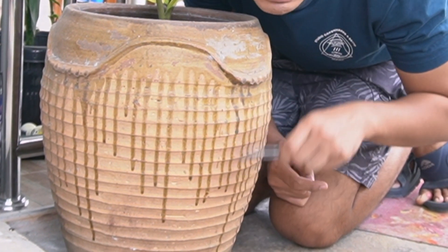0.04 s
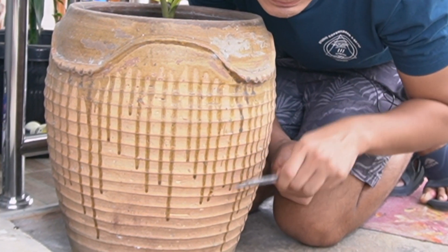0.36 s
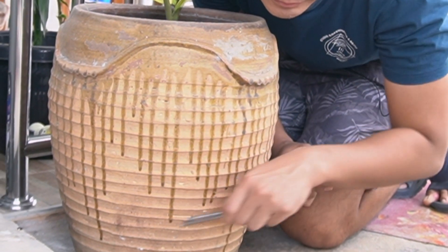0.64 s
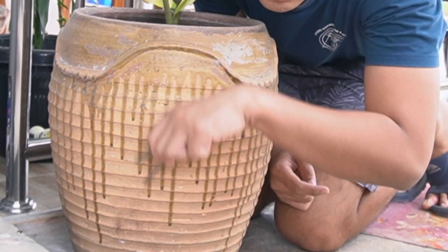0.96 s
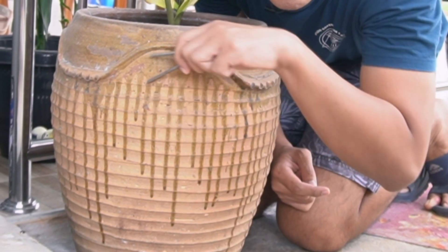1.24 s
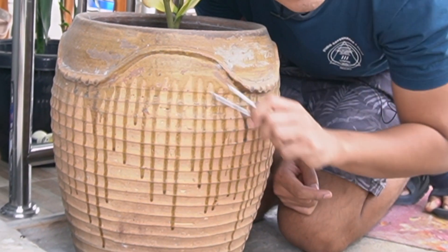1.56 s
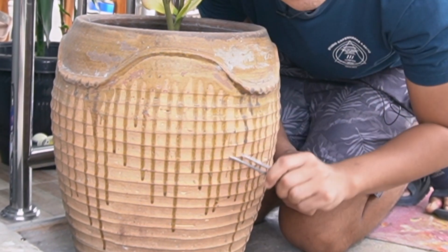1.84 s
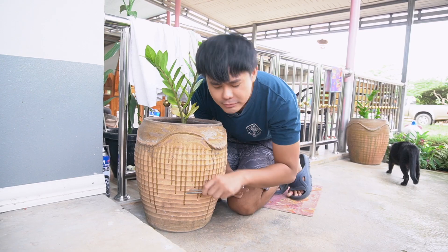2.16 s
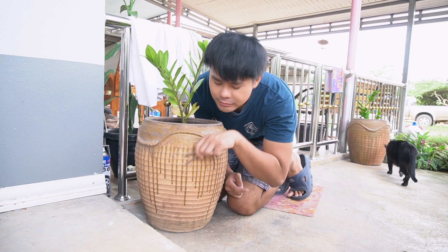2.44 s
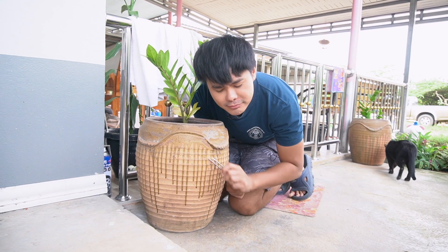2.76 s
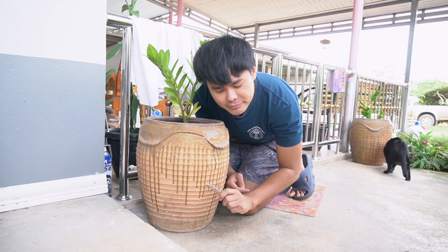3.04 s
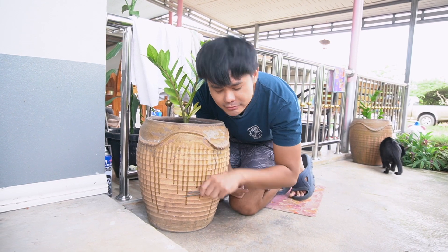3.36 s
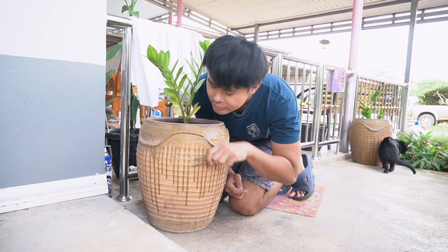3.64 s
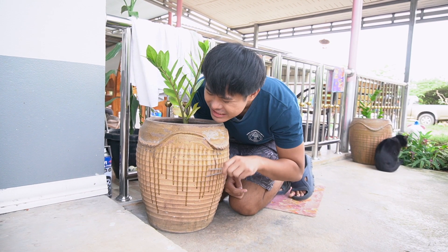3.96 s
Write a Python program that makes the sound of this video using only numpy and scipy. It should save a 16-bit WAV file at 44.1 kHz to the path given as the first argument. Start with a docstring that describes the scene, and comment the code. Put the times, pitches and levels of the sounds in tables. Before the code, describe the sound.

A metal utensil scrapes back and forth over a ribbed clay pot, gritty and ringing.

```python
"""Gritty, ringing scrapes: a pronged metal utensil is dragged to and fro over a large ribbed clay pot.
Sandy grains under the tip make the prongs and the pot wall ring; at each ridge the tip catches in a
harsher burst, and now and then a prong squeaks. The place of contact decides which parts of the pot
answer. An open porch adds a short echo, and faint outdoor rumble lies beneath."""
import sys
import numpy as np
from scipy import signal
from scipy.fft import rfft, irfft
from scipy.io import wavfile
from scipy.ndimage import uniform_filter1d, map_coordinates

SR = 44100
rng = np.random.default_rng(int(sys.argv[2]) if len(sys.argv) > 2 else 0)


def unload_wav(signal):
    """Save mono or channel-first audio to the path in sys.argv[1] as 16-bit WAV at rate SR, clipped to [-1, 1]."""
    wavfile.write(
        sys.argv[1],
        SR,
        np.round(np.clip(np.atleast_2d(signal).T, -1, 1) * 32767).astype(np.int16),
    )


N = 176400
WANDER_PER_S, TOP_HZ = 16, 15850

# sliding strokes (start [s], end [s], first level [dB], last level [dB],
# treble trim [dB], belly trim [dB], rim trim [dB], wall trim [dB])
STROKES = [(0, 0.005, -12.5, -28.5, -3.5, 13, 2, 6.5), (0.059, 0.098, -23, -22, 0, -2, -9, -5.5),
           (0.1, 0.163, -31, -34, -5, 2, 7, 13), (0.198, 0.26, -23.5, -35, -2.5, 5, 10, 4),
           (0.251, 0.407, -32, -32.5, -10, 21.5, 6.5, 11), (0.417, 0.499, -32, -33, -1.5, 17, 5, 12.5),
           (0.547, 0.655, -22, -29.5, -0.5, -11, 13, 5), (0.654, 0.84, -27.5, -29.5, -6.5, 3, -1, 4.5),
           (0.863, 0.91, -29, -27, -5, -9, -1, 2), (0.909, 1.012, -28.5, -19, -0.5, -4.5, -6, 4),
           (1.01, 1.254, -25, -15, -0.5, -11, 3.5, 0), (1.274, 1.324, -27.5, -33.5, 0, 5, 13, -12),
           (1.341, 1.515, -35, -33, -0.5, 11.5, 14.5, -5.5), (1.491, 1.573, -24.5, -18.5, -3, -1.5, 4, -12),
           (1.592, 1.788, -24, -30.5, -2, 5, 5.5, -31), (1.798, 2.022, -22.5, -29.5, -11, 10.5, 3.5, -3),
           (2.092, 2.21, -30.5, -31.5, -4.5, -12, 4, 5.5), (2.295, 2.323, -26.5, -50, -3, -24, -19, -2),
           (2.333, 2.421, -17, -26, -0.5, -4.5, -3, -3), (2.417, 2.488, -17.5, -13.5, -1, 2, 0.5, -0.5),
           (2.487, 2.581, -27, -18.5, -5.5, 5, 7.5, -2.5), (2.642, 2.752, -38.5, -18.5, -0.5, 2, 8, -11),
           (2.743, 2.862, -19.5, -28, 0.5, 3, 2.5, -8), (2.868, 2.923, -28.5, -17.5, 1, -4, 8.5, -9.5),
           (2.936, 3.016, -30.5, -11.5, -3.5, 7, -4, -6), (3.01, 3.165, -32, -24, -1, 12, 6, 4.5),
           (3.179, 3.352, -22, -35, -1, 10.5, 5, 4.5), (3.38, 3.423, -33, -34, -10, 0, -3, 4),
           (3.445, 3.506, -31, -29.5, 0, 11, 0, 0.5), (3.502, 3.625, -12, -19, -2, -3, -11, -1),
           (3.637, 3.717, -19.5, -32.5, -3, 6, 6, -1), (3.744, 3.809, -28, -15.5, 4.5, 3.5, 2.5, 2.5),
           (3.8, 3.839, -29, -13, 5.5, 6.5, -7, 0), (3.86, 3.944, -60, -44.5, -2, 22, -28, -20),
           (3.951, 3.987, -22.5, -49, 8.5, 10, 3.5, 2.5)]
# the tip catching on ridges (start [s], length [s], level [dB], treble trim [dB], pot trim [dB])
RIDGE_CATCHES = [(0.254, 0.007, -9.5, 0, 0.5), (0.292, 0.0065, -10, 0, -9), (0.359, 0.023, -14.5, -4, -6),
                 (0.894, 0.028, -18.5, -2, -19), (1.007, 0.021, -18, -0.5, -14),
                 (1.047, 0.016, -18.5, 0.5, 0.5), (1.082, 0.016, -13, -0.5, -14),
                 (1.137, 0.019, -25, 13, -8), (1.375, 0.0074, -26.5, -4, -6),
                 (1.611, 0.022, -16.5, -2, 0.5), (1.688, 0.036, -19, -5, -20), (1.741, 0.012, -17, 2, -6),
                 (1.799, 0.011, -13, 8, -17), (1.858, 0.025, -18, -1, -9), (1.913, 0.018, -21, 3.5, 1.5),
                 (1.981, 0.012, -11.5, 3, -2), (2.044, 0.02, -14.5, 2.5, 0.5), (2.197, 0.0083, -16.5, 0, 5),
                 (2.428, 0.025, -21, 10, -13), (2.511, 0.0078, -18, 5, 4.5),
                 (2.554, 0.019, -20.5, -11, -2.5), (2.649, 0.01, -12.5, -0.5, -3),
                 (2.776, 0.019, -17.5, 1, -19), (2.825, 0.02, -16, -9, -7.5),
                 (2.946, 0.014, -13.5, 4.5, -3), (3.058, 0.013, -10.5, 6, -12),
                 (3.14, 0.012, -13.5, 3.5, -10), (3.386, 0.0092, -20.5, 0.5, -21),
                 (3.504, 0.0062, -14, 2, -8), (3.571, 0.0069, -15, 9.5, 4), (3.602, 0.0059, -8.5, 3, -21),
                 (3.83, 0.024, -21, -22, 2), (3.984, 0.018, -12.5, -1, -9)]
def pressure():
    """Drive envelopes of the dragged tip: overall, for the grit's treble, and for belly, rim and wall."""
    power = np.zeros((5, N))
    for start, end, first_db, last_db, *trims_db in STROKES:
        at, progress, shape = contact(start, end - start, rise=.001, fall=.004)
        stroke = amp(first_db + (last_db - first_db) * progress) * shape
        power[:, at] += (amp([0, *trims_db])[:, None] * stroke) ** 2
    for start, length, db, treble_db, pot_db in RIDGE_CATCHES:
        at, _, shape = contact(start, length, rise=.003, fall=.003)
        trims = amp([0, treble_db, pot_db, pot_db, pot_db])[:, None]
        power[:, at] += (trims * amp(db) * shape) ** 2
    return np.sqrt(power)


def friction(grains_per_s=2600, spread_db=4, chatter_db=2.5):
    """Tiny slips over sand grains, uneven in size and clumped by the chatter of the tip."""
    slips = (rng.random(N) < grains_per_s / SR) * rng.choice([-1., 1.], N)
    size_db = spread_db * np.clip(rng.standard_normal(N), -2, 2)
    return unit(slips * amp(size_db + chatter_db * drift(per_s=170)))


# modes of the utensil (frequency [Hz], level [dB], t60 [s])
PRONG_MODES = [(3415, -22, .1), (3520, -15.5, .12), (3568, -17, .13), (3683, -10.5, .17), (3782, -12, .16),
               (4258, -19, .12), (4336, -15.5, .14), (4396, -16, .15), (4520, -23, .08), (5080, -24, .12),
               (6185, -25, .13), (6385, -21, .09), (7025, -23, .07), (7370, -27, .08)]
def prongs(force):
    """The metal rings; each mode's share drifts with the grip."""
    ring = sum(amp(db) * mode(force * wander(depth_db=2), hz, t60) for hz, db, t60 in PRONG_MODES)
    return butter(bend(ring, depth_s=.00006), 6, 7800)


# clay modes: belly, lower wall, two of the rim, then wall overtones (frequency [Hz], level [dB], t60 [s])
POT_MODES = [(411, -24, .42), (580, -31, .06), (960, -27, .12), (1120, -27, .12), (1425, -30, .06),
             (1744, -25.5, .16), (1799, -25.5, .16), (2140, -25, .08), (2365, -20.5, .18), (2829, -21, .14),
             (2964, -18, .14), (3148, -17, .14), (3255, -21, .14), (4030, -15, .18)]
# centre of the hollow rasp, moving with the place of contact (time [s], frequency [Hz])
HOLLOW_SWEEP = [(.51, 1140), (.545, 523), (.63, 730), (.9, 1040), (1.2, 1106), (1.48, 1075), (1.63, 920),
                (1.7, 1136), (2.7, 978), (2.95, 1138), (3.5, 970)]
# how far the contact favours an upper wall overtone over a lower pair (time [s], tilt [dB])
WALL_TILT = [(2.1, -0.5), (2.2, 4)]
def pot(slips, belly, rim, wall, tip, rim_reach_hz=86):
    """The clay body rings; a hollow rasp follows the contact and wakes the rim mode nearest to it."""
    t = np.arange(N) / SR
    centre = np.interp(t, *np.transpose(HOLLOW_SWEEP))
    tilt = amp(np.interp(t, *np.transpose(WALL_TILT)))
    rims = [rim / np.hypot(1, (hz - centre) / rim_reach_hz) for hz, _, _ in POT_MODES[2:4]]
    drives = [belly, wall, *rims, tip, wall / tilt, wall / tilt, wall, wall * tilt] + [tip] * 5
    push = unit(np.tanh(slips / 2))  # the clay evens out the largest slips
    hum, *rings = [amp(db) * mode(push * drive * wander(depth_db=1.5), hz, t60)
                   for (hz, db, t60), drive in zip(POT_MODES, drives)]
    body = sum(rings) + butter(hum, 1, [350, 480], "band")
    hollow = unit(mode(mode(push, centre, t60=.018), centre, t60=.018))
    return body + amp(-32) * rim * hollow


# tone curve of the rasp (frequency [Hz], relative level [dB])
RASP_EQ = [(150, -38.5), (200, -12), (310, -18), (650, -66), (850, -90), (2050, -55.5), (2600, -10.5),
           (2850, 12.5), (3330, 3.5), (3650, 14.5), (3950, 6.5), (4350, 9.5), (4700, -18), (6400, -45),
           (8000, -6), (16000, -58)]
def rasp(force):
    """Dense ringing of clay and metal fills in between the modes."""
    ring = through(force, tail(t60=.1))
    return through(.45 * force + ring, colour(RASP_EQ))


# tone curve of the crunching grains (frequency [Hz], relative level [dB])
GRIT_EQ = [(1500, -23), (3500, -6), (4900, 4), (5600, 7), (6400, 19), (6750, 12.5), (7100, 17.5),
           (7550, 12), (7900, 2), (8300, 14), (9100, 2), (9600, 10), (10000, -3.5), (10700, 9.5),
           (11300, 1), (12000, 7.5), (12900, -0.5), (15700, -7)]
def grit(slips, treble):
    """Grains crunch and ring high partials; two sets trade places as the prongs turn against the clay."""
    crunch = unit(slips * abs(slips) ** .7) * treble  # large grains crack out of the hiss
    turn = drift(per_s=10)
    glints = sum(through(crunch * share, partials(t60=.11)) for share in (np.cos(turn), np.sin(turn)))
    return through(.55 * crunch + bend(glints, depth_s=.00025), colour(GRIT_EQ))


# squeaks and thin squeals of a prong (start [s], length [s], pitch [Hz], level [dB])
PRONG_SQUEAKS = [(1.162, 0.032, 3500, -17.5), (1.209, 0.0065, 3420, -19), (1.211, 0.011, 5080, -21),
                 (1.237, 0.0099, 3550, -16), (1.521, 0.082, 4100, -33), (1.595, 0.046, 6385, -40),
                 (1.686, 0.087, 7080, -38), (1.841, 0.023, 7580, -30), (1.918, 0.026, 3685, -19.5),
                 (2.548, 0.016, 3580, -28.5), (2.655, 0.064, 5110, -46), (2.744, 0.11, 7150, -36),
                 (3.061, 0.0075, 3760, -14), (3.952, 0.021, 3680, -19)]
def squeaks(sag_per_s=.18, shake_hz=85, octave_db=-28):
    """Stick and slip lock onto one prong mode for a while: a rough, sagging tone with a weak octave."""
    out = np.zeros(N)
    shake = shake_hz * drift(per_s=900)
    flutter = wander(depth_db=4, per_s=900)
    for start, length, hz, db in PRONG_SQUEAKS:
        at, progress, shape = contact(start, length, rise=.002, fall=.012, release_samples=4000)
        pitch = hz * (1 - sag_per_s * length * progress) + shake[at]
        phase = 2 * np.pi * np.cumsum(pitch) / SR
        tone = np.sin(phase) + amp(octave_db) * np.sin(2 * phase)
        out[at] += np.sqrt(2) * amp(db) * shape * flutter[at] * tone
    return out


# tone curve of the outdoor bed (frequency [Hz], relative level [dB])
OUTDOOR_EQ = [(20, 4), (45, -11), (58, 14.5), (76, 1), (210, 4), (320, -10.5), (700, -17), (1500, -12),
              (5000, -25), (15000, -45)]
def outdoors(puff_at_s=1.17, puff_width_s=.07):
    """Steady distant rumble, and one soft puff of air brushing the microphone."""
    rumble = through(rng.standard_normal(N), colour(OUTDOOR_EQ, size=16384))
    puff = unit(butter(rng.standard_normal(N), 2, 42.8))
    swell = np.exp(-((np.arange(N) / SR - puff_at_s) / puff_width_s) ** 2)
    return amp(-52) * rumble + amp(-49) * puff * swell


def contact(start, length, rise, fall, release_samples=2000):
    """Sample indices, progress and envelope of one contact: attack, hold, release, timed in seconds."""
    first = max(round(start * SR), 0)
    at = np.arange(first, min(first + max(round(length * SR), 0) + release_samples, N))
    t = (at - first) / SR
    progress = np.minimum(t / max(length, 1 / SR), 1)
    return at, progress, np.minimum(t / rise, 1) * np.exp(-np.maximum(t - length, 0) / fall)


def mode(x, hz, t60):
    """One decaying resonance, steady or swept, that keeps the power of white noise."""
    decay = np.exp(-np.log(1000) / t60 / SR)
    turn = np.exp(2j * np.pi * np.cumsum(hz * np.ones(N)) / SR)
    return np.sqrt(2 * (1 - decay ** 2)) * (turn * signal.lfilter([1], [1, -decay], x / turn)).real


def bend(x, depth_s):
    """The changing load on the metal bends its partials: the ringing runs ahead or lags."""
    lag = depth_s * SR * uniform_filter1d(drift(WANDER_PER_S), SR // WANDER_PER_S)
    return map_coordinates(x, [np.arange(N) - lag], mode="nearest")


def partials(t60, count=100, size=8000):
    """Ring of energy 1 made of separate modes, unevenly spaced across the band."""
    t = np.arange(size) / SR
    place, phase = rng.random((2, count, 1))
    hz = (np.arange(count)[:, None] + place) * TOP_HZ / count
    ring = np.sin(2 * np.pi * (hz * t + phase)).sum(0) * np.exp(-np.log(1000) * t / t60)
    return ring / np.linalg.norm(ring)


def tail(t60, size=20000):
    """Dense random ringing of energy 1."""
    ring = rng.choice([-1., 1.], size) * np.exp(-np.log(1000) * np.arange(size) / SR / t60)
    return ring / np.linalg.norm(ring)


def colour(curve, size=2048):
    """Minimum-phase impulse response of energy 1 with the given tone curve."""
    hz, db = np.transpose(curve)
    log_gain = np.log(amp(np.interp(np.log(np.fft.rfftfreq(size, 1 / SR) + 1), np.log(hz), db)))
    cepstrum = irfft(log_gain)
    cepstrum[1:size // 2] *= 2
    cepstrum[size // 2 + 1:] = 0
    response = irfft(np.exp(rfft(cepstrum)))
    return response / np.linalg.norm(response)


def drift(per_s):
    """Random curve of rms 1 that takes a new value per_s times a second."""
    return unit(np.interp(np.arange(N) / SR * per_s, np.arange(N), rng.standard_normal(N)))


def wander(depth_db, per_s=WANDER_PER_S):
    """Randomly drifting gain of rms 1."""
    return unit(amp(depth_db * drift(per_s)))


def through(x, response):
    """Convolution, cut to the scene's length."""
    return signal.fftconvolve(x, response)[:N]


def butter(x, order, hz, kind="low"):
    """Flat-passband filter, low-pass by default."""
    return signal.sosfilt(signal.butter(order, hz, kind, fs=SR, output="sos"), x)


def amp(db):
    """Decibels to gain."""
    return 10 ** (np.asarray(db) / 20)


def unit(x):
    """Scales to rms 1."""
    return x / np.sqrt(np.mean(x ** 2) + 1e-20)


def scene():
    """One stream of slips feeds clay, metal and grit; the porch adds a short echo."""
    tip, treble, belly, rim, wall = pressure()
    slips = friction()
    force = slips * tip
    scrape = amp(-9.5) * rasp(force) + pot(slips, belly, rim, wall, tip)
    scrape += prongs(force) + squeaks() + amp(-16) * grit(slips, treble)
    porch_echo = amp(-21) * through(scrape, tail(t60=.3))
    return (scrape + porch_echo + outdoors())[None]


def record(dry):
    """A steep high cut on the whole mix."""
    high_cut = signal.firwin(511, TOP_HZ, window=("kaiser", 9), fs=SR)
    return signal.oaconvolve(dry, high_cut[None], "same")


dry = scene()
out = record(dry)
unload_wav(out)
```